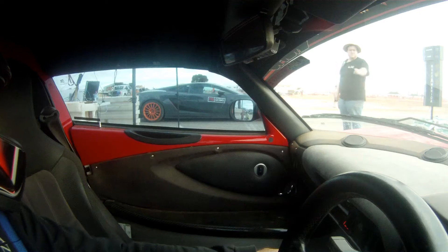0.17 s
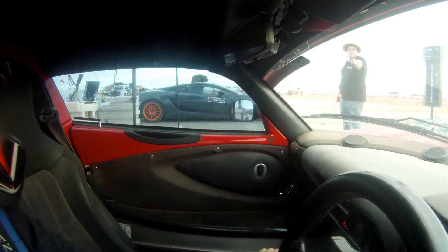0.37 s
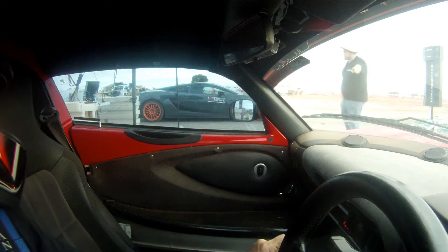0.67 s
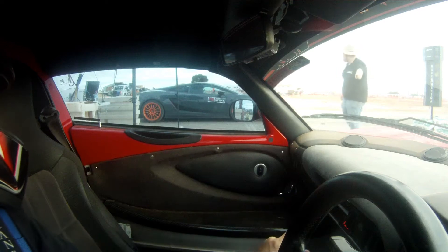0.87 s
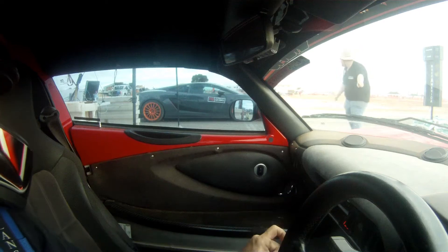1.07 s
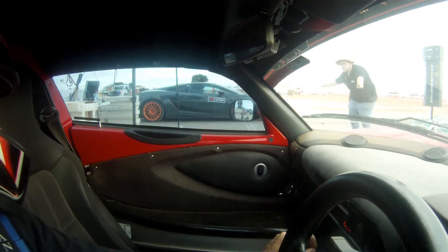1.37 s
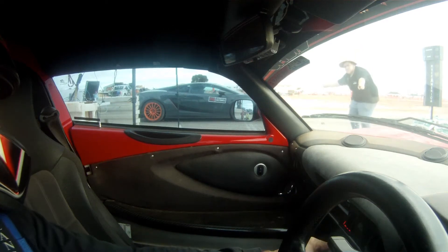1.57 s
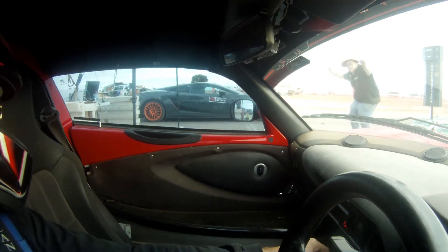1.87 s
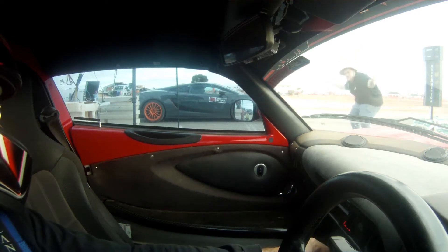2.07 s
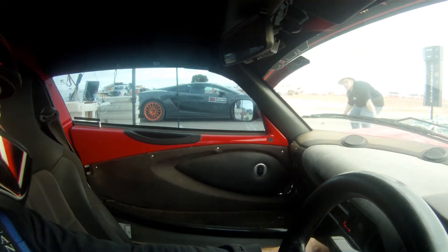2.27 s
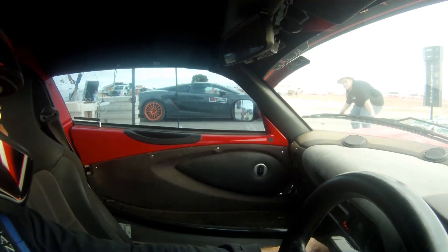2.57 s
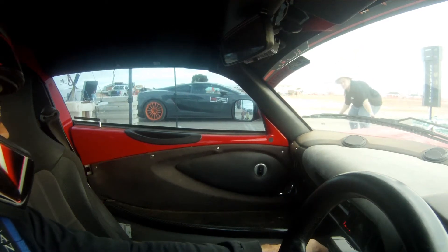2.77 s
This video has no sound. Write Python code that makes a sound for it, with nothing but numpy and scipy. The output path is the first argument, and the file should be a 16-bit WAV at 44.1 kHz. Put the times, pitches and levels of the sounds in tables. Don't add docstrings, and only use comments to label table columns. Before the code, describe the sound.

Car engine idling as a low cabin drone, then revving into a booming surge near the end

```python
import sys
import numpy as np
from scipy import signal
from scipy.io import wavfile
from scipy.ndimage import uniform_filter1d

SR = 44100
rng = np.random.default_rng(int(sys.argv[2]) if len(sys.argv) > 2 else 0)


def nominal_scale(level):
    x = np.asarray(level, float) / 20
    return 10 ** x


def put_to_file(sound):
    columns = np.atleast_2d(sound).T
    safe = np.clip(columns, -1, 1)
    whole_steps = np.round(safe * 32767)
    wavfile.write(sys.argv[1], SR, whole_steps.astype(np.int16))


N = 129213

# start_s, firing_hz, level_db, throttle (0 to 1)
OWN_ENGINE = [(.12, 33.42, -31, 0.03), (1.2, 34.05, -31.5, 0.04), (1.4, 33.45, -34, 0.1),
              (1.6, 34.19, -32, .05), (2.1, 33.05, -32.5, 0.04), (2.2, 34.78, -37, 0),
              (2.3, 39.65, -29, .4), (2.42, 45.13, -25.5, 0.73), (2.47, 50.85, -21.5, 0.62),
              (2.53, 56.6, -15, 0.89), (2.62, 58.22, -12, 0.6), (2.66, 60.85, -18, 0),
              (2.69, 65.63, -35.5, 0.34), (2.74, 67.17, -24.5, 0.9), (2.78, 65.3, -17, 0.8),
              (2.85, 65.46, -13.5, 0.82), (2.93, 66.3, -23, 0)]
# multiple_of_firing, idle_level_db
OWN_SIDE_TONES = [(0.498, -55.5), (1.251, -47.5), (1.502, -52.5), (1.999, -44.5), (2.498, -48.5)]
# start_s, level_db
NEIGHBOUR_IDLE = [(.13, -38), (.24, -25.5), (.55, -28), (.9, -22.5), (1.3, -23), (1.4, -22.5),
                  (1.458, -13.5), (1.52, -35), (1.599, -20.5), (1.719, -22.5), (1.95, -22.5), (2.13, -34),
                  (2.199, -31)]
# start_s, firing_hz, level_db
NEIGHBOUR_LAUNCH = [
    (2.3, 57.5, -34),
    (2.6, 53.06, -31.5),
    (2.7, 51.7, -27.5),
    (2.8, 49.6, -19.5),
    (2.93, 50.5, -33.5),
]
# multiple_of_firing, level_db
NEIGHBOUR_SIDE_TONES = [(.8, -16.5), (1.4, -34), (1.6, -17.5), (1.12, -12), (2.8, -42)]
# pitch_hz, width_hz, level_db, rise_at_full_throttle_db
TRIM_PANELS = [(178.8, 35, 0.5, 6.5), (221.3, 30, -8, 13.5), (279.8, 14, -5, 1), (342.6, 22, -10.5, 17),
               (392.3, 27, -7, 7), (571.4, 21, -3, 4.5), (609, 45, -7.5, 14.5), (638.3, 35, 0, -1.5),
               (777, 100, -1.5, 2.5), (938, 100, -7, 2.5), (1487, 360, -8.5, 3), (2170, 570, -6.5, 0.5),
               (2363, 337, -2.5, 3), (3280, 440, -12, 5.5)]
# pitch_hz, level_db
PUMP_WHINES = [(964, -67.5), (1030, -70.5), (2067, -66.5), (2673, -72), (589, -65.5)]
# pitch_hz, level_db_per_hz
RUMBLE_SPECTRUM = [(20, -16), (45, 3.5), (90, -6.5), (130, -34.5), (400, -23.5), (1300, -44), (3900, -54),
                   (5500, -51)]
# start_s, length_s, bright_db, dull_db, rasp_db
CONTROL_KNOCKS = [
    (0.492, 0.0065, -62.5, -46.5, -83.5),
    (0.599, 0.029, -66, -60, -66),
    (0.653, 0.019, -63.5, -52, -66.5),
    (1.026, 0.024, -64, -57, -63.5),
    (1.173, 0.016, -43, -45.5, -65),
    (1.19, 0.017, -47, -54, -58.5),
    (1.871, 0.04, -63, -40.5, -84),
    (1.899, 0.029, -48, -41.5, -89),
    (2.844, 0.014, -67, -41.5, -80),
]
# pitch_hz, width_hz, level_db
CONTROL_RINGING = [(1530, 450, -3.5), (2130, 260, 10), (3060, 900, -7)]
# centre_s, pitch_hz, length_s, level_db
BODY_THUDS = [(0.69, 87, 0.025, -30), (1.03, 83, 0.02, -46), (1.38, 51, 0.017, -22.5),
              (1.956, 85.05, 0.084, -29), (2.6, 178, 0.0094, -38), (2.37, 88, 0.066, -35),
              (2.53, 345, 0.043, -45), (2.72, 390, 0.05, -49), (2.81, 333, 0.057, -47),
              (2.78, 603, .06, -46.5), (2.6, 670, .05, -51)]
# start_s, pitch_hz, level_db
GEAR_MOAN = [
    (1.2, 158.6, -63.5),
    (1.38, 166, -41),
    (1.55, 165.2, -51),
    (1.75, 163.6, -56),
    (1.95, 162.4, -49.5),
    (2.08, 175, -43.5),
    (2.2, 187, -49.5),
    (2.3, 192.8, -64),
]
# start_s, peak_level_db
HOUSING_TICKS = [(1.454, -40), (2.412, -55.5), (2.546, -46), (2.581, -47.5), (2.588, -44.5), (2.613, -46.5),
                 (2.622, -41), (2.631, -56), (2.803, -48.5), (2.846, -36.5), (2.848, -41), (2.853, -47),
                 (2.863, -47.5)]


def level(x, db):
    return x * nominal_scale(db) / np.sqrt(np.mean(x ** 2))


def col(table, index):
    rows = np.array(table, float)
    return np.interp(np.arange(N) / SR, rows[:, 0], rows[:, index])


def band(x, hz, width_hz):
    return signal.lfilter(*signal.iirpeak(hz, hz / width_hz, fs=SR), x)


def walk(rate_hz):
    hold = int(SR / rate_hz)
    steps = np.repeat(rng.standard_normal(N // hold + 1), hold)
    smooth = uniform_filter1d(uniform_filter1d(steps, hold), hold)
    return 1.103 * smooth[:N]


def engine(firing_hz, level_db, side_db, side_tones):
    pitch_wander, lump_db, lump_hz = .004, 4.5, 9.7
    cabin_edge_hz, cabin_fall_db_per_octave = 90, 40
    turns = np.cumsum(firing_hz * (1 + pitch_wander * walk(6.04))) / SR
    sides = 0
    for multiple, db in side_tones:
        octaves_above = np.maximum(np.log2(multiple * firing_hz / cabin_edge_hz), 0)
        cabin_db = -cabin_fall_db_per_octave * octaves_above
        loudness = nominal_scale(side_db + db + cabin_db + lump_db * walk(lump_hz))
        sides = sides + loudness * np.sin(2 * np.pi * (multiple * turns + rng.random()))
    firing = nominal_scale(level_db) * np.sin(2 * np.pi * turns)
    return np.sqrt(2) * (firing + sides), turns


def own_engine(throttle):
    side_db = 12.5 * throttle
    return engine(col(OWN_ENGINE, index=1), col(OWN_ENGINE, index=2), side_db, OWN_SIDE_TONES)


def neighbour_engine():
    idle_hz = 60.2
    rows = [(s, idle_hz, db) for s, db in NEIGHBOUR_IDLE] + list(NEIGHBOUR_LAUNCH)
    level_db = col(rows, index=2)
    side_db = uniform_filter1d(level_db, size=SR // 3)
    sound, _ = engine(col(rows, index=1), level_db, side_db, NEIGHBOUR_SIDE_TONES)
    return sound


def clatter(turns, throttle):
    spread_db, gate_depth_db, flicker_db = 1.8, 1.5, .6
    gate = nominal_scale(gate_depth_db * np.cos(2 * np.pi * turns))
    overtones = sum(np.sin(2 * np.pi * (k * turns + rng.random())) for k in range(4, 12))
    overtones = nominal_scale(-19) * throttle ** 2 * overtones
    out = 0
    for hz, width_hz, db, rise_db in TRIM_PANELS:
        rattle = rng.standard_normal(N) * nominal_scale(spread_db * walk(180)) * gate
        filter_hz = 1.287 * width_hz
        ring = band(band(rattle + overtones, hz, filter_hz), hz, filter_hz) * np.sqrt(SR / width_hz)
        out = out + ring * nominal_scale(db + rise_db * throttle + flicker_db * walk(9.93))
    return out * nominal_scale(-59)


def pump_whines():
    out = 0
    for hz, db in PUMP_WHINES:
        turns = np.cumsum(hz * (1 + .0012 * walk(9))) / SR
        out = out + nominal_scale(db + 2.8 * walk(8)) * np.sin(2 * np.pi * turns)
    return np.sqrt(2) * out


def rumble(throttle):
    rows = np.array(RUMBLE_SPECTRUM, float)
    out = 0
    for hz in 22 * 2 ** np.arange(0, 8.1, .5):
        db_per_hz = np.interp(np.log(hz), np.log(rows[:, 0]), rows[:, 1])
        db = db_per_hz + 10 * np.log10(hz)
        noise = band(band(rng.standard_normal(N), hz, hz / 2), hz, hz / 2)
        out = out + level(noise, db) * nominal_scale(1.7 * walk(6.94))
    return level(out, -37) * nominal_scale(3.0 * throttle)


def control_knocks():
    t = np.arange(N) / SR
    strikes_per_s, strike_db = 2500, 13
    dull_hz, dull_width_hz = 350, 450
    rasp_hz, rasp_width_hz = 4760, 680
    strikes = rng.random(N) < strikes_per_s / SR
    scrape = rng.standard_normal((3, N)) * (1 + nominal_scale(strike_db) * strikes)
    bright = 0
    for hz, width_hz, db in CONTROL_RINGING:
        ring = band(band(scrape[0], hz, width_hz), hz, 3 * width_hz)
        bright = bright + nominal_scale(db) * ring / np.sqrt(width_hz)
    bright = level(bright, 0)
    dull = level(band(band(scrape[1], dull_hz, dull_width_hz), dull_hz, 2 * dull_width_hz), 0)
    rasp = level(band(band(scrape[2], rasp_hz, rasp_width_hz), rasp_hz, rasp_width_hz), 0)
    out = 0
    for start_s, length_s, bright_db, dull_db, rasp_db in CONTROL_KNOCKS:
        rise = np.clip((t - start_s) / (length_s / 7), 0, 1)
        fade = np.exp(-(np.maximum(t - start_s, 0) / length_s) ** 2)
        noise = nominal_scale(bright_db) * bright + nominal_scale(dull_db) * dull + nominal_scale(rasp_db) * rasp
        out = out + rise * fade * noise
    return out


def body_thuds():
    t = np.arange(N) / SR
    out = 0
    for centre_s, hz, length_s, db in BODY_THUDS:
        swell = np.exp(-((t - centre_s) / length_s) ** 2)
        out = out + nominal_scale(db + 3) * swell * np.sin(2 * np.pi * hz * t)
    return out


def gear_moan():
    turns = np.cumsum(col(GEAR_MOAN, index=1)) / SR
    return np.sqrt(2) * nominal_scale(col(GEAR_MOAN, index=2)) * np.sin(2 * np.pi * turns)


def housing_ticks():
    t = np.arange(N) / SR
    fade_s, rebound_s, rebound = .00016, .0011, -.75
    snaps = 0
    for start_s, db in HOUSING_TICKS:
        snaps = snaps + nominal_scale(db) * (t >= start_s) * np.exp(-np.maximum(t - start_s, 0) / fade_s)
    snaps = snaps + rebound * np.roll(snaps, int(rebound_s * SR))
    return nominal_scale(12) * band(snaps, hz=1900, width_hz=4000)


def scene():
    throttle = np.clip(col(OWN_ENGINE, index=3), 0, 1.2)
    own, turns = own_engine(throttle)
    engines = own + neighbour_engine() + clatter(turns, throttle)
    cabin = pump_whines() + rumble(throttle) + gear_moan()
    handling = control_knocks() + body_thuds() + housing_ticks()
    return (engines + cabin + handling)[None]


def roll_off(x):
    return signal.sosfilt(signal.butter(12, 15150, fs=SR, output="sos"), x)


def record(dry):
    start_s, edge_hz, hold_hz, grid_hz = .11669, 5700, 12000, 48000
    soft = signal.sosfilt(signal.butter(6, edge_hz, fs=SR, output="sos"), dry[0])
    slow = signal.resample_poly(soft, hold_hz, SR)
    stairs = np.repeat(slow, grid_hz // hold_hz)
    held = signal.resample_poly(stairs, SR, grid_hz)[:N]
    held = np.pad(held, (0, N - len(held)), mode="edge")
    held = held * (np.arange(N) / SR >= start_s)
    return roll_off(held[None])


dry = scene()
out = record(dry)
put_to_file(out)
```